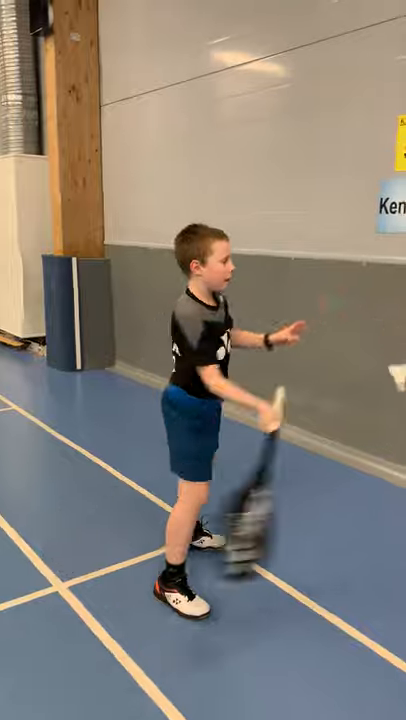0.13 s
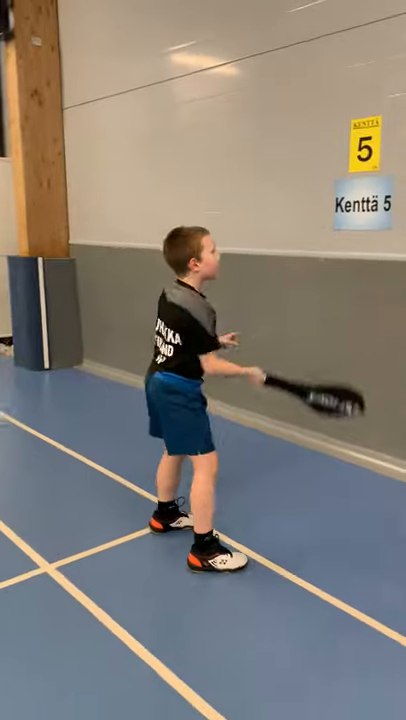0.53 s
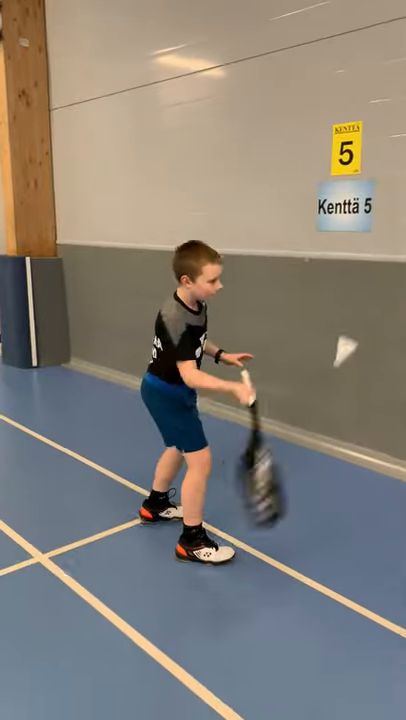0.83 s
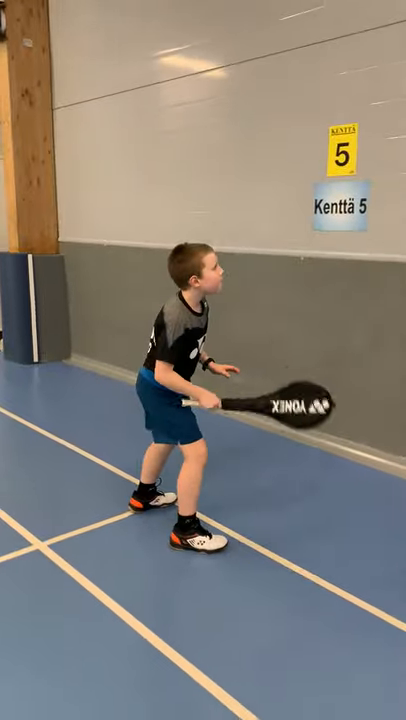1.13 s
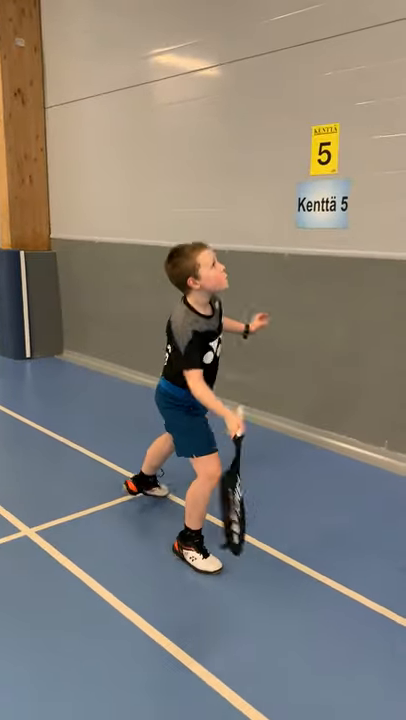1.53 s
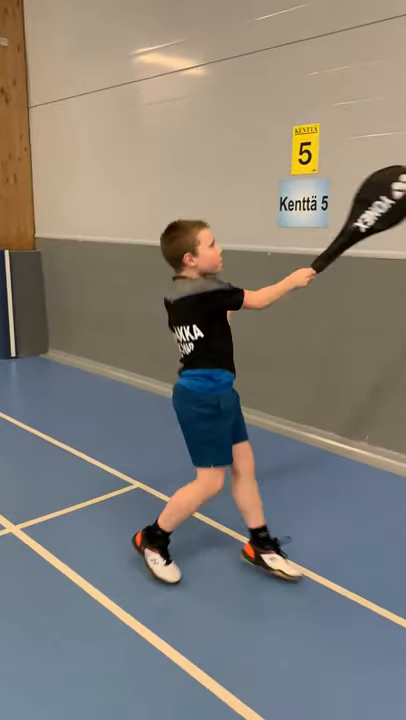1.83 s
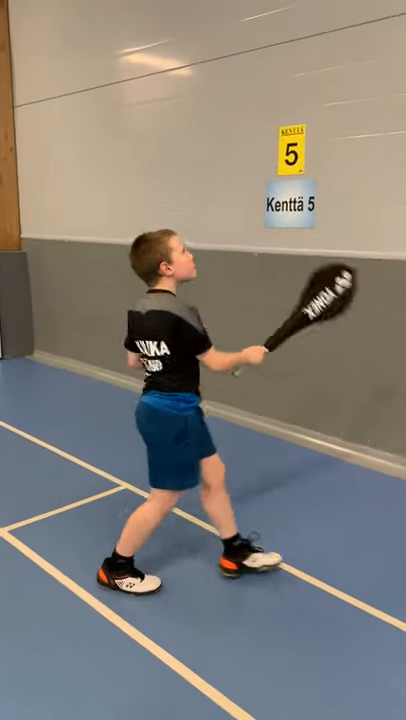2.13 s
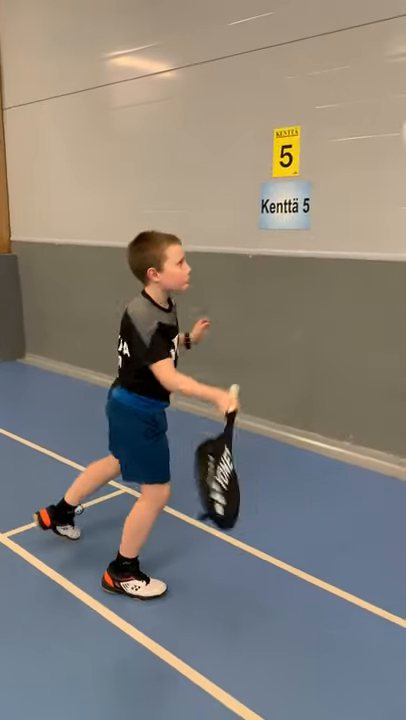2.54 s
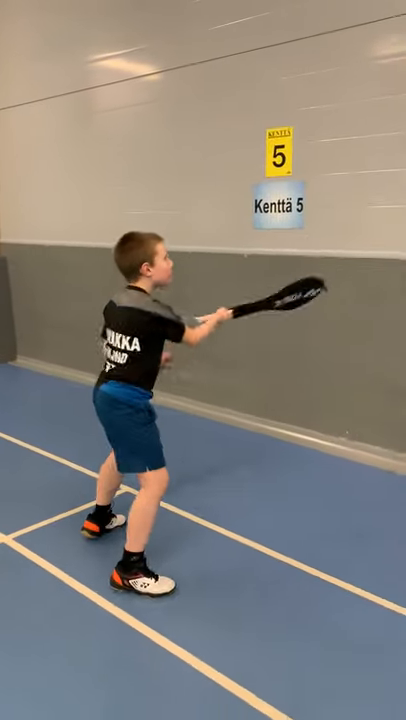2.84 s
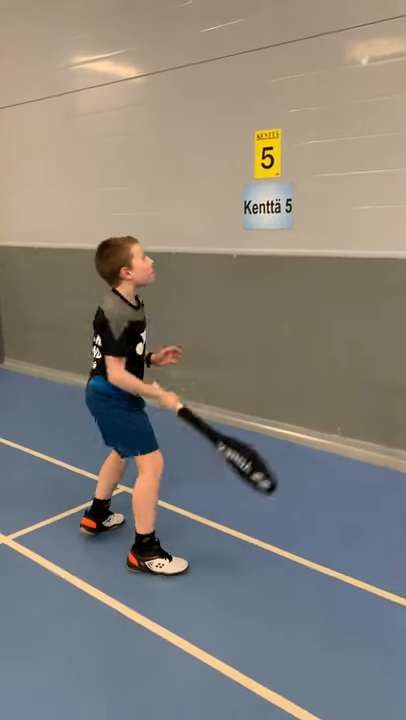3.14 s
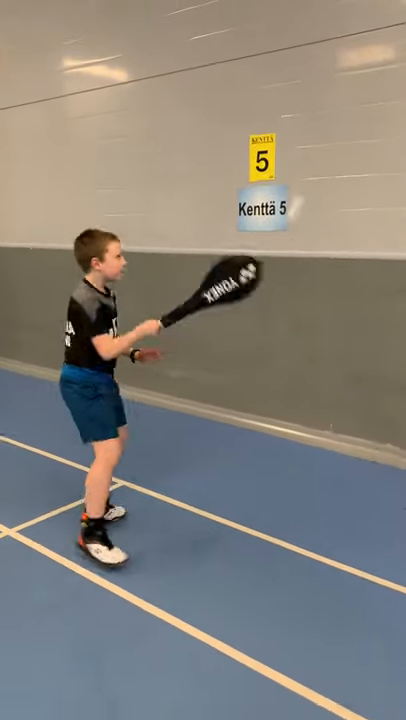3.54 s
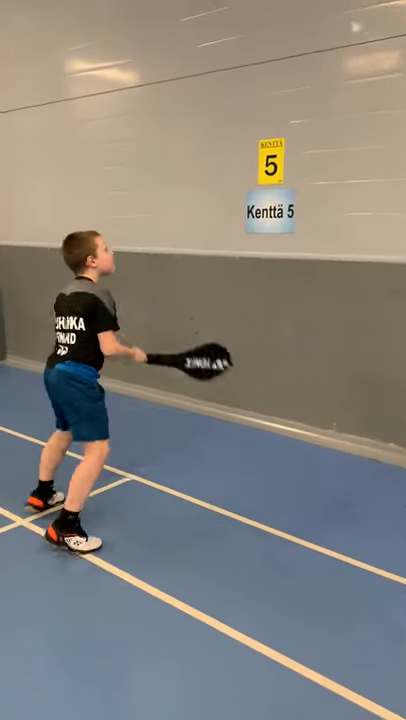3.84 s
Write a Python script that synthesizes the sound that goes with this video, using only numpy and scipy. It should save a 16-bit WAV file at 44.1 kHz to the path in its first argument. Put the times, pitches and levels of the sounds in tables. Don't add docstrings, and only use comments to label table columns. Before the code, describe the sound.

Five drumming, slapping racket hits, each followed by a shuttlecock knocking the wall in an echoing sports hall

```python
import sys
import numpy as np
from scipy import signal
from scipy.fft import rfft, irfft, next_fast_len
from scipy.io import wavfile
from scipy.ndimage import uniform_filter1d

SR = 44100
rng = np.random.default_rng(int(sys.argv[2]) if len(sys.argv) > 2 else 0)


def makeup_ratio(level_db):
    decades = np.asarray(level_db, float) / 20
    return 10 ** decades


def wav_out(sig):
    wavfile.write(sys.argv[1], SR, np.round(np.clip(np.atleast_2d(sig).T, -1, 1) * 32767).astype(np.int16))


N = 176400
T = np.arange(SR // 10) / SR

# [t/s, peak level/dB, drum f/Hz, slap delay/s, slap level/dB]
STROKES = [
    (0.1913, -14.5, 599, 0.0079, -0.3),
    (.8625, -11.5, 655, 0.0095, -4.5),
    (1.7605, -12.5, 701, 0.0097, -4),
    (2.656, -13, 553, .0095, 0),
    (3.4763, -10.5, 653, 0.01, -6),
]
# [t/s, peak level/dB, f/Hz, click level/dB]
WALL_HITS = [
    (0.3076, -.5, 1247, -22.5),
    (1.0660, -7.5, 1350, -29.5),
    (1.9557, -3, 1310, -27),
    (2.8295, -3, 1330, -23.5),
    (3.6756, -1.5, 1328, -25.5),
]
# [t/s, peak level/dB, starting f/Hz]
STAMPS = [
    (1.606, -11.5, 303),
    (1.620, -9, 480),
    (1.672, -16.5, 359),
    (1.815, -16, 267),
]
# [t/s, level/dB, length/s, lowest f/Hz, hall share/dB]
SCUFFS = [(0.118, -68, 0.0095, 12000, -6), (0.459, -50, 0.041, 4630, -39), (0.728, -65, .05, 4900, -14),
          (1.202, -64.5, .015, 5100, 11), (1.306, -69, 0.016, 11000, -11), (1.321, -56, .04, 3950, -7),
          (1.588, -56, 0.013, 9900, -17), (1.599, -53, 0.018, 8000, -4), (2.306, -59, 0.024, 6850, -4),
          (2.323, -33.5, 0.0084, 2370, 8.5), (2.572, -56, .015, 11000, 1),
          (2.977, -37.5, 0.002, 3500, 16.5), (3.883, -57, .012, 4840, -3), (3.982, -48, 0.043, 3970, -11),
          (0.963, -52, .03, 7000, -26), (1.102, -48, .003, 3500, 8.5), (1.552, -49, 0.0023, 348, -3),
          (1.618, -52, .002, 3000, 9), (2.014, -45, .003, 3500, -1), (3.729, -44, .003, 3500, 3),
          (3.812, -60, .02, 6000, -5), (3.903, -45, .004, 4000, 8), (3.997, -38, .003, 3000, 0)]
# [t/s, level/dB, length/s]
SQUEAKS = [
    (.93, -58, 0.16),
    (1.677, -54, 0.12),
    (3.091, -51.5, 0.13),
]
# [t/s, peak level/dB, f/Hz, t60/s]
STEPS = [
    (0.038, -34.5, 372, 0.089),
    (1.188, -34.5, 78, 0.28),
    (3.216, -34, 198.5, 0.82),
    (3.402, -26.5, 207, 0.4),
    (3.646, -30, 210, 0.34),
    (3.871, -38, 88.5, 0.37),
]
# [t/s, level/dB, f/Hz, t60/s]
PING = (3.68, -51, 5000, .9)
# [f/Hz, width/Hz, level/dB]
RUBBER_MODES = [(8760, 250, 2), (10370, 500, -4), (12000, 800, -6.5)]
# [multiple of pitch/1, level/dB]
COVER_MODES = [(1, -3), (.56, -12), (1.75, -14), (3.2, -15)]
# [multiple of pitch/1, level/dB]
CORK_MODES = [(1, 0), (.86, -5), (2.15, -40), (.26, -16)]
# [f/Hz, level/dB]
CLICK_SPECTRUM = [(300, -21), (1500, 19), (4000, 8.5), (8000, -2.5), (15000, 1)]
# [delay t/s, level/dB]
ECHOES = [(.013, -19), (.021, -19), (.033, -19), (.045, -19), (.064, -18), (.088, -17)]
# [f/Hz, t60/s]
HALL_T60 = [(60, 0.45), (250, 5.4), (1000, 2), (3000, 1.49), (7000, 0.57), (14000, 0.37)]
# [f/Hz, level/dB]
HALL_TONE = [(60, 3.5), (300, -1.5), (1200, 4), (3000, 3.5), (8000, 0.5), (15000, -6)]
# [f/Hz, density level/dB per Hz]
AIR_SPECTRUM = [(15, -50), (35, -14.5), (80, -4), (130, -12), (430, -5.5), (1250, -12), (2700, -27.5),
                (8500, -51.5), (15600, -72)]
# [t/s, level/dB]
ACTIVITY = [(0, -32.5), (.5, -30.5), (1, -29.5), (1.5, -31.5), (2, -33), (2.5, -32), (3, -32), (3.4, -29.5),
            (4, -29)]
# [t/s, level/dB]
DRONE_LEVEL = [(0, -54), (.4, -46), (.65, -42), (1.05, -42), (1.3, -54), (4, -56)]
# [f/Hz, correlation/1]
PORT_LIKENESS = [(130, .998), (200, .97), (300, .82), (500, .05), (1200, 0), (3000, .6), (4300, .995),
                 (9000, .999)]
# [f/Hz, phase/rad]
PORT_LEAD = [(0, 0), (500, -.5), (1000, -.6), (1500, .5), (2600, 2.1), (4150, 2.2), (4800, 3.14),
             (15350, 18.85), (22050, 18.85)]
# [f/Hz, level/dB]
PHONE_EDGE = [(35, -14), (60, 0), (15600, 0), (15850, -16), (16400, -20), (16900, -60)]


def unit(x):
    return x / np.sqrt(np.mean(x ** 2) + 1e-20)


def along(points, hz):
    f, v = np.transpose(points)
    return np.interp(np.log(hz + 1), np.log(f + 1), v)


def curve(rows):
    return np.interp(np.arange(N) / SR, *np.transpose(rows))


def filtered(x, response):
    n = x.shape[-1]
    m = next_fast_len(n + 4096)
    return irfft(rfft(x, m) * response(np.fft.rfftfreq(m, 1 / SR)), m)[..., :n]


def peaks(hz, rows):
    return sum(makeup_ratio(db) * 1j * hz * w / (c * c - hz * hz + 1j * hz * w) for c, w, db in rows)


def ring(pitch_hz, modes, rise, t60, at=0):
    t = np.maximum(T - at, 0)
    body = 0
    for multiple, db in modes:
        body = body + makeup_ratio(db + rng.normal(0, 1.5)) * np.sin(2 * np.pi * multiple * pitch_hz * t)
    return body * (1 - np.exp(-(t / rise) ** 2)) * makeup_ratio(-60 * t / t60) * 2


def click(at, t60=.004):
    burst = rng.standard_normal(len(T)) * (T >= at) * makeup_ratio(-60 * np.maximum(T - at, 0) / t60)
    burst[round(at * SR)] = 2.5
    return filtered(burst, lambda hz: makeup_ratio(along(CLICK_SPECTRUM, hz)))


def hall_tail(sound, wet_db):
    rise_s, lumps_db = 0.0017, 2
    hz, t, z = signal.stft(rng.standard_normal((2, 7 * SR // 4)), SR, nperseg=512)
    power = np.abs(rfft(sound, 16384)) ** 2
    fine, broad = [uniform_filter1d(power, size=k)[::32] for k in (36, 640)]
    colour = np.sqrt(np.abs(np.where(hz < 2500, fine, broad)))[:, None]
    lumps = makeup_ratio(lumps_db * unit(uniform_filter1d(rng.standard_normal(z.shape[1:]), size=12, axis=0)))
    t60 = along(HALL_T60, hz)[:, None]
    fade = makeup_ratio(along(HALL_TONE, hz)[:, None] - 60 * t / t60)
    fade = fade / np.sqrt(SR * t60 / np.log(10 ** 6))
    tail = makeup_ratio(wet_db) * signal.istft(z * fade * colour * lumps, nperseg=512)[1]
    return tail * (1 - np.exp(-(np.arange(tail.shape[1]) / SR / rise_s) ** 2))


def place(out_s, sound, wet_db, pan_db=0):
    echo_dull_hz = 3500
    heard = hall_tail(sound, wet_db)
    early = np.zeros((2, SR // 10))
    for s, db in ECHOES:
        early[[0, 1], round(s * SR) + rng.integers(0, 12, 2)] = makeup_ratio(db + rng.normal(0, 1.5, 2))
    early = filtered(early, lambda f: 1 / (1 + 1j * f / echo_dull_hz))
    early[:, 0] += makeup_ratio(np.array([pan_db, -pan_db]) / 2)
    near = signal.fftconvolve(sound[None], early, axes=1)
    heard[:, :near.shape[1]] += near
    return np.pad(heard, ((0, 0), (round(out_s * SR), N)))[:, :N]


def cover_hit(hz, lag, slap_db):
    def muffled(lag):
        lift_s, muffle_s = .0021, .0014
        return np.exp(-(np.maximum(T - lag + lift_s, 0) / muffle_s) ** 2)

    tick = makeup_ratio(-17) * click(0)
    rustle = makeup_ratio(-27) * click(0.0077, t60=0.093)
    drum = ring(hz, COVER_MODES, 0.0028, 0.082) * muffled(lag)
    slap = ring(1.173 * hz, COVER_MODES, 0.00044, 0.024, at=lag + 0.00092) * muffled(lag + 0.0063)
    slap_clicks = click(lag) + click(lag + .0019)
    return (tick + rustle + drum + near_wall_answer(lag + .020)
            + makeup_ratio(slap_db + 2.5) * slap + makeup_ratio(slap_db - 5.5) * slap_clicks)


def near_wall_answer(at):
    body = ring(1250, [(0.906, -7.5), (1.55, -25), (.6, -9.5)], 0.00067, .02, at=at)
    return body + makeup_ratio(-24) * click(at)


def racket():
    wet_db, pan_db = -0.55, -9
    return sum(place(s, makeup_ratio(db) * cover_hit(hz, lag, slap_db), wet_db, pan_db)
               for s, db, hz, lag, slap_db in STROKES)


def wall():
    rise_s, t60_s, skirt_s = .0022, .014, 0.0036
    wet_db, pan_db = -3.5, -2.5
    out = 0
    for s, db, hz, click_db in WALL_HITS:
        cork = makeup_ratio(db) * ring(hz, CORK_MODES, rise_s, t60_s)
        skirt = makeup_ratio(db - 10) * ring(hz, CORK_MODES, rise_s, t60_s, at=skirt_s)
        cracks = click(0) + makeup_ratio(-6.5) * click(skirt_s, t60=0.018)
        out = out + place(s, cork + skirt + makeup_ratio(click_db) * cracks, wet_db, pan_db)
    return out


def stamps():
    fall_s, end_ratio, wet_db = 0.01255, 0.057, 4.5
    fall = end_ratio * T + (1 - end_ratio) * fall_s * (1 - np.exp(-T / fall_s))
    shape = (1 - np.exp(-(T / 0.0021) ** 2)) * makeup_ratio(-60 * T / 0.036) * 2
    out = 0
    for s, db, hz in STAMPS:
        thump = shape * np.sin(2 * np.pi * hz * fall)
        boom = ring(85.2, [(0.91, -4.5)], 0.02, 0.083)
        out = out + place(s, makeup_ratio(db) * (thump + boom), wet_db)
    return out


def rub(length, response):
    grit_db = 2.5
    t = np.arange(2 * len(T)) / SR
    noise = rng.standard_normal(len(t))
    patches = unit(uniform_filter1d(rng.standard_normal(len(t)), size=80))
    grit = unit(filtered(noise * makeup_ratio(grit_db * patches), response))
    return grit * np.clip(t / (0.4 * length), 0, 1) * np.exp(-(t / length) ** 2)


def scuffs():
    top_hz = 9000

    def band(hz):
        return lambda f: (1j * f / hz / (1 + 1j * f / hz)) ** 4 / (1 + (f / top_hz) ** 2)
    return sum(place(s, makeup_ratio(db) * rub(length, band(hz)), wet_db) for s, db, length, hz, wet_db in SCUFFS)


def squeaks():
    wet_db = -2.5
    return sum(place(s, makeup_ratio(db) * rub(length, lambda f: peaks(f, RUBBER_MODES) ** 2), wet_db)
               for s, db, length in SQUEAKS)


def ping():
    s, db, hz, t60 = PING
    t = np.maximum(np.arange(N) / SR - s, 0)
    return makeup_ratio(db - 60 * t / t60) * np.sin(2 * np.pi * hz * t) * (t < .21)


def steps():
    wet_db = 4.5
    fade_out = np.cos(np.pi / 2 * T / T[-1])
    return sum(place(s, makeup_ratio(db) * fade_out * ring(hz, [(0.96, 0.0056)], 0.02, t60), wet_db)
               for s, db, hz, t60 in STEPS)


def narrow_noise(hz, width_hz):
    return unit(filtered(rng.standard_normal(N), lambda f: peaks(f, [(hz, width_hz, 0)]) ** 2))


def hall_air():
    z = signal.stft(rng.standard_normal((2, N)), nperseg=512)[2]
    patches = uniform_filter1d(rng.standard_normal(z.shape[1:]), 5, axis=0)
    patches = unit(uniform_filter1d(patches, 12, axis=1))
    pair = signal.istft(z * makeup_ratio(2.2 * patches), nperseg=512)[1][:, :N]
    wash = unit(filtered(pair, lambda hz: makeup_ratio(along(AIR_SPECTRUM, hz)))) * makeup_ratio(curve(ACTIVITY) - 3.0)
    drone = narrow_noise(115.5, 10.5) * makeup_ratio(curve(DRONE_LEVEL))
    whine = narrow_noise(13800, 12) * makeup_ratio(-78)
    return wash + drone + whine


def scene():
    return racket() + wall() + stamps() + scuffs() + squeaks() + ping() + steps() + hall_air()


def roll_off(x):
    return signal.sosfilt(signal.butter(12, 16980, fs=SR, output="sos"), x)


def record(dry):
    start_s, fade_s = 0.035, 0.0021

    def mid_side_gain(hz):
        turn = np.arccos(np.clip(along(PORT_LIKENESS, hz), -1, 1)) / 2
        return np.sqrt(2) * np.array([np.cos(turn), np.sin(turn)])

    def port_response(hz):
        half_lead = .5j * np.interp(hz, *np.transpose(PORT_LEAD))
        return np.exp(half_lead * np.array([[1], [-1]])) * makeup_ratio(along(PHONE_EDGE, hz))

    pair = np.array([dry[0] + dry[1], dry[0] - dry[1]]) / 2
    mid, side = filtered(pair, mid_side_gain)
    mix = filtered(np.array([mid + side, mid - side]), port_response)
    mix = mix * np.clip((np.arange(N) / SR - start_s) / fade_s, 0, 1)
    return roll_off(mix)


dry = scene()
out = record(dry)
wav_out(out)
```